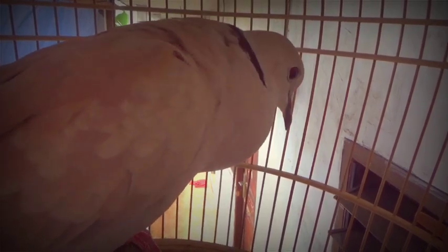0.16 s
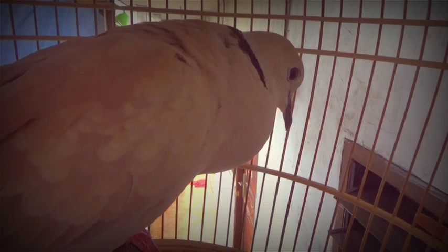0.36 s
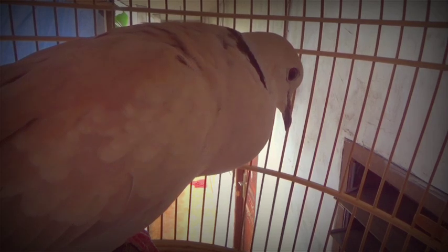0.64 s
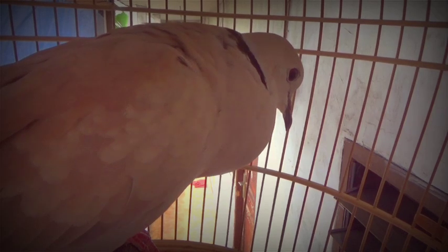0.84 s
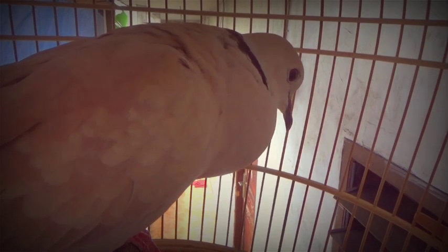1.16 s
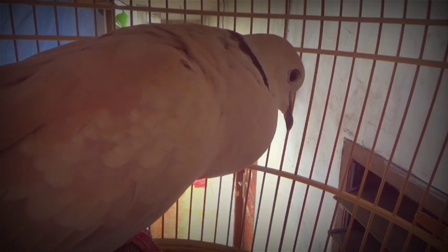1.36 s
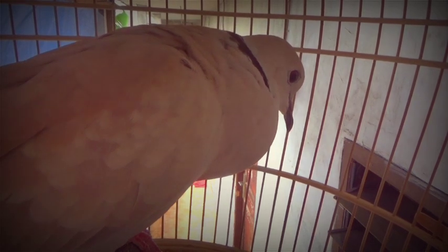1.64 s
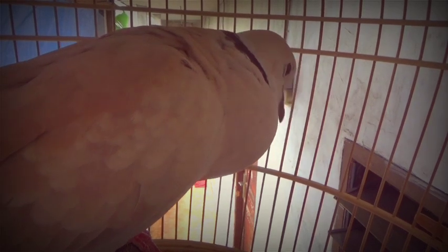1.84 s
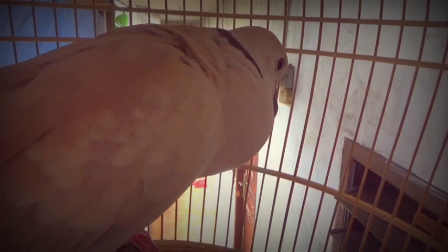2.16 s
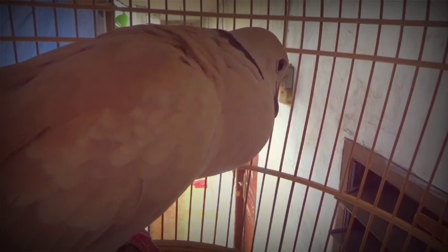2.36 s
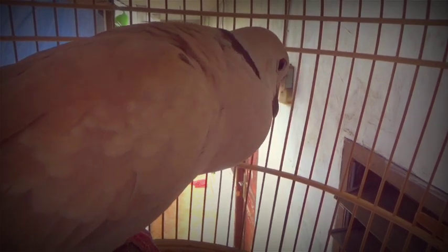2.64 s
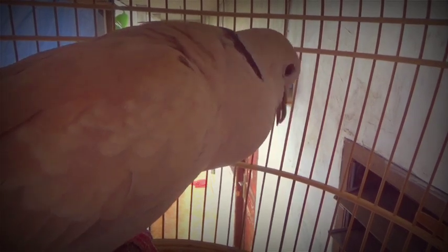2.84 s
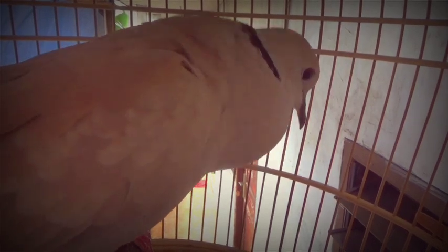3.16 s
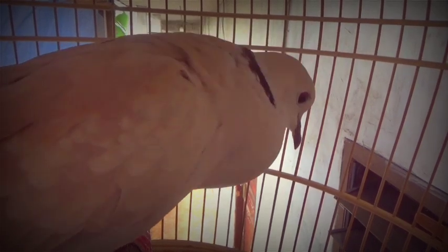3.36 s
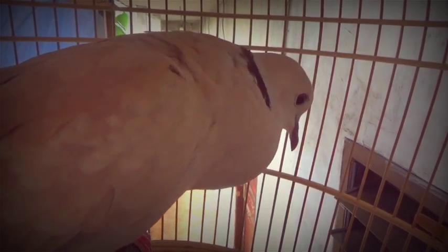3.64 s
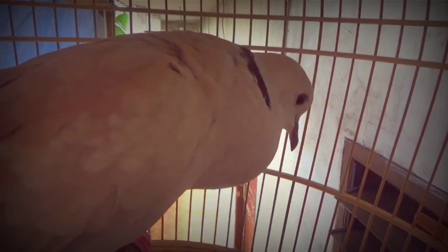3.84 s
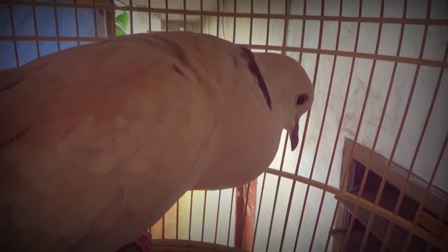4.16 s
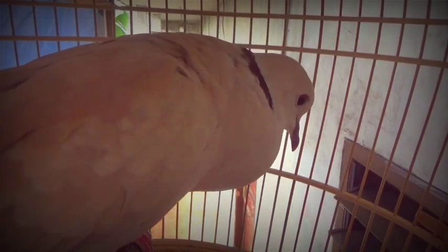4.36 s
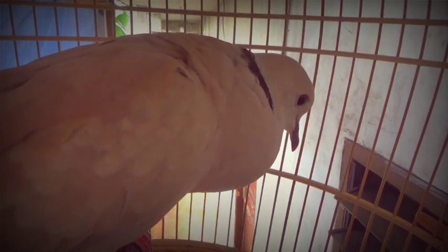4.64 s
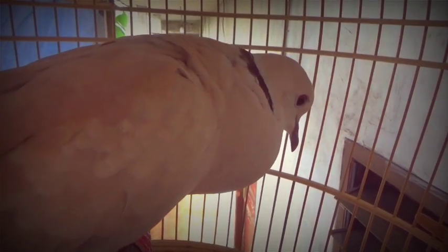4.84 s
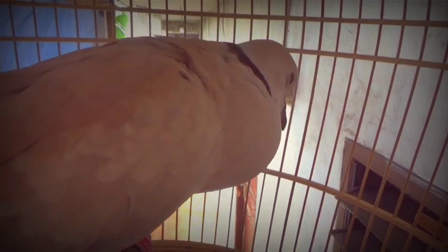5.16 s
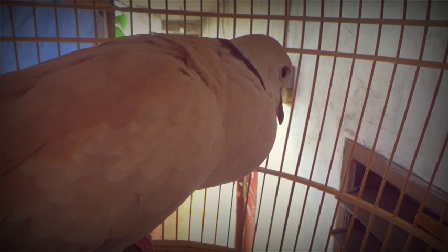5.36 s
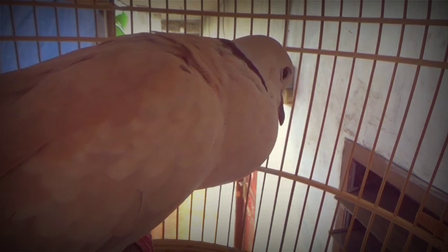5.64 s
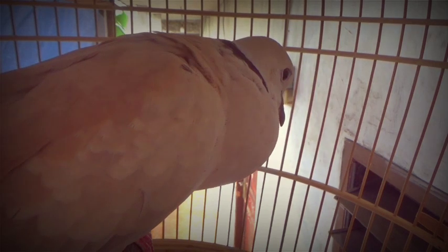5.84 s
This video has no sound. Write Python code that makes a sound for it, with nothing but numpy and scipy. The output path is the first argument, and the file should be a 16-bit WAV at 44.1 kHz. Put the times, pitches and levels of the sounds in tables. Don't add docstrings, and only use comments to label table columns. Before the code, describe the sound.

Close stereo pickup of a closed-beak dove call: low bubbling pulses, a long pure hoot sinking to a lower note, a croaky inhaled moan, a brief hoot, more pulses and another long hoot bending downward. Further off, harsh parrot-like squeaks come during the first coo and small chirps later, blurred by a short room echo. Dry cage creaks, a very faint fast insect tick, soft air hiss and low distant traffic lie underneath.

```python
import sys
import numpy as np
from scipy import signal
from scipy.io import wavfile
from scipy.ndimage import uniform_filter1d, minimum_filter1d

SR = 44100
rng = np.random.default_rng(int(sys.argv[2]) if len(sys.argv) > 2 else 0)


def convert_level_to_amplitude(level_db):
    exponent = np.asarray(level_db, float) / 20
    return 10 ** exponent


def digitize_waveform(pressure):
    field = np.atleast_2d(pressure).T
    bounded = np.clip(field, -1, 1)
    quanta = np.round(bounded * 32767).astype(np.int16)
    wavfile.write(sys.argv[1], SR, quanta)


N = 264908
T = np.arange(N) / SR

# start_s, pitch_hz, level_db
FALLING = [
    (0.284, 552.4, -14.5),
    (0.7, 543.6, -10),
    (0.87, 547.5, -9),
    (1.15, 539.4, -6.5),
    (1.45, 532, -5),
    (1.94, 506, -2.5),
    (2.03, 490, -2),
    (2.112, 460.4, -0.5),
    (2.124, 436, -2),
]
# start_s, pitch_hz, level_db
LOW = [
    (2.137, 406.5, -6.5),
    (2.17, 405.6, -8.5),
    (2.3, 408.3, -8.5),
    (2.39, 397.6, -9),
    (2.44, 399.6, -12),
]
# start_s, pitch_hz, level_db
SHORT = [
    (3.25, 540.4, -15.5),
    (3.388, 532.1, -11),
    (3.41, 539.4, -13.5),
]
# start_s, pitch_hz, level_db
LAST = [
    (4.104, 539.5, -14),
    (4.4, 536.8, -9),
    (5.001, 539.6, -7.5),
    (5.311, 538.9, -7),
    (5.55, 520.2, -3.5),
    (6.01, 473, -1.5),
]
# start_s, end_s
LONG_NOTES = [
    (0.284, 2.44),
    (3.25, 3.41),
    (4.104, 6.0),
]
# pitch_hz, left_lead_rad, left_over_right_db
STANDING_WAVES = [(405, .18, -1), (480, .03, -1.5), (505, -.1, 0), (530, -.35, -1), (540, -.42, -2),
                  (550, -.46, -3.8), (563, -.3, -6.5)]
# overtone_hz, level_db below the fundamental
LEAK = [(800, -24), (1080, -30.5), (1230, -38), (1620, -32), (2160, -44.5), (2700, -55), (3240, -46.5),
        (4300, -60.5), (5200, -43.5), (5900, -57), (6500, -61.5), (9700, -64), (11000, -68), (15000, -74.5)]
# pitch_hz, leak_db
MUFFLE = [(400, -11), (455, -19), (500, -10.5), (525, -1.2), (545, 2.5)]
SWELL_DB_PER_HZ = .05


def coo():
    parts = trill_parts()
    points = FALLING + LOW + SHORT + LAST
    for s, length, db, start_hz, end_hz in parts:
        end_db = db + SWELL_DB_PER_HZ * (end_hz - start_hz)
        points = points + [(s, start_hz, db), (s + length, end_hz, end_db)]
    pitch, level_db = in_time(sorted(map(tuple, points)))

    overshoot_hz, settle_s, scoop_share, scoop_s = 28.24, .07, .75, .013
    onset_db, onset_s = 1.5, .0066
    for start, end in LONG_NOTES:
        age = np.clip(T - start, 0, None)
        on = (T >= start) & (T < end)
        pitch = pitch + on * overshoot_hz * (np.exp(-age / settle_s) - scoop_share * np.exp(-age / scoop_s))
        level_db = level_db + on * onset_db * np.exp(-age / onset_s)

    pulses = np.zeros(N)
    for s, length, *_ in parts:
        near = slice(round((s - .01) * SR), round((s + length + .02) * SR))
        pulses[near] = np.minimum(pulses[near] + gate(T[near], s, s + length, .0072, .008), 1)
    held = sum(gate(T, start - .004, end + .006, .008, .022) for start, end in LONG_NOTES)
    level = np.minimum(pulses + held, 1) * convert_level_to_amplitude(uniform_filter1d(level_db, size=220))

    settled = uniform_filter1d(pitch, size=800)
    place_hz, lead, pan_db = np.transpose(STANDING_WAVES)
    leak_db = at_hz(MUFFLE, settled)
    pitch = pitch * (1 + .0012 * drift(36))
    shimmer = 1 + .018 * drift(43)
    tone = stack(pitch, [level * shimmer], lead=np.interp(settled, place_hz, lead))

    crop_hz, crop_width_hz, crop_db, air_db = 425, 26, -5, -15.5
    into_crop = convert_level_to_amplitude(crop_db) * pulses * tone + convert_level_to_amplitude(air_db) * level * drift(620)
    ring = resonance(into_crop, crop_hz, crop_width_hz)

    effort_db = .051 * (level_db + 7)
    overtones = [0]
    for k in range(2, 25):
        db = leak_db + at_hz(LEAK, k * pitch) + k * (effort_db + .23 * drift(4))
        overtones.append(level * convert_level_to_amplitude(db) * (1 + .023 * k * drift(70)))
    leak = stack(pitch, overtones, lead=-.9) * convert_level_to_amplitude([[2.0], [-2.0]])
    pan = convert_level_to_amplitude(np.interp(settled, place_hz, pan_db) * [[.5], [-.5]])
    return (tone + ring) * pan + leak


# start_s, length_s, pitch_hz, head_db, body_db
TRILL = [(0.030, .021, 480, -19, -21), (0.080, .021, 417, -5.5, -10.5), (0.132, .043, 421, -4.5, -10.5),
         (0.204, .0135, 493, -5, -7), (0.220, .035, 415, -8.5, -13), (3.221, .0085, 385, -6.5, -9),
         (3.832, .007, 440, -18, -19), (3.869, .011, 420, -6, -7), (3.915, .015, 438, -6, -7.5),
         (3.964, .038, 490, -10, -7), (4.033, .047, 494, -7, -6.5)]
# start_s, length_s, level_db, start_hz, end_hz
SLIDES = [
    (0.256, .021, -9.5, 425, 490),
    (3.230, .016, -7, 420, 465),
    (3.413, .012, -21, 495, 450),
    (4.081, .021, -10.5, 507, 535),
]


def trill_parts():
    head_s, gap_s, snap_hz, snap_share = .011, .0005, 495, .45
    heads, bodies = [], []
    for s, length, hz, head_db, body_db in TRILL:
        heads.append((s, min(length, head_s), head_db, hz + snap_share * (snap_hz - hz), hz))
        if length > head_s:
            bodies.append((s + head_s + gap_s, length - head_s - gap_s, body_db, hz, hz))
    return heads + bodies + SLIDES


def pops():
    pop_db, pop_hz, pop_width_hz, pop_s = -31, 790, 1500, .006
    starts = [(row[0], row[3]) for row in TRILL] + [(row[0], row[2]) for row in SLIDES]
    burst = np.zeros(N)
    for s, db in starts:
        burst[round(s * SR)] = convert_level_to_amplitude(db + pop_db)
    burst = signal.lfilter([1], [1, -np.exp(-1 / (pop_s * SR))], burst)
    puff = resonance(rng.standard_normal(N), pop_hz, pop_width_hz)
    return rms_one(resonance(puff, pop_hz, pop_width_hz)) * burst


# start_s, pitch_hz, crop_db, throat_db, roughness (0-1)
WAIL = [
    (2.51, 208.8, -19, -36, .1),
    (2.572, 230, -10.5, -30, .17),
    (2.63, 247, -13.5, -21, .13),
    (2.83, 214, -25, -16, .4),
    (2.9, 218.5, -24, -4, .25),
    (2.966, 200.6, -21, -3, .11),
    (3.02, 174.4, -26, -10, .13),
    (3.076, 164.5, -28, -18, .15),
    (3.11, 152, -44, -32, .4),
]
# start_hz, end_hz, level_db
WHISTLES = [(5130, 5170, -55), (5200, 5500, -57), (6300, 6800, -63), (8000, 9100, -54), (9600, 10200, -60),
            (14000, 13200, -62)]


def wail():
    pitch, crop_db, throat_db, rough = in_time(WAIL)
    rough = np.clip(rough, 0, 1)
    gains = [convert_level_to_amplitude(np.interp(T, [2.97, 3.02], [-38, -55]))]
    for k in range(2, 8):
        crop = convert_level_to_amplitude(crop_db) * peak(k * pitch, 440, 212, 0) ** 2
        nasal = rough ** 3 * peak(k * pitch, 672, 59, 4)
        throat = convert_level_to_amplitude(throat_db) * peak(k * pitch, 820.4, 69.5, 0)
        gains.append(crop + nasal + throat)
    levels = [g * (1 + .9 * rough * drift(70)) for g in gains]
    voice = stack(pitch * (1 + .041 * rough * drift(45)), levels, lead=.27)

    white = rng.standard_normal(N)
    dull = resonance(resonance(white, 730, 300), 730, 300)
    bright = resonance(resonance(white, 2150, 900), 2150, 900)
    rasp = convert_level_to_amplitude(-8) * dull + convert_level_to_amplitude(-27) * bright
    voice = gate(T, 2.513, 3.1, .008, .02) * voice + gate(T, 2.52, 3.155, .02, .03) * rough * rasp

    share = np.clip((T - 2.6) / .45, 0, 1)
    air = 0
    for start_hz, end_hz, db in WHISTLES:
        phase = 2 * np.pi * np.cumsum(start_hz + (end_hz - start_hz) * share) / SR
        air = air + convert_level_to_amplitude(db + drift(8)) * (.77 + drift(200)) * np.sin(phase)
    return voice + gate(T, 2.62, 3.024, .08, .15) * air


# start_s, length_s, start_hz, end_hz, level_db
SQUEAKS = [(1.145, 0.017, 3011, 2740, -24), (1.15, 0.022, 2494, 2584, -20), (1.509, 0.015, 3270, 2990, -32),
           (1.511, 0.018, 2774, 2460, -28), (1.534, .070, 2457, 2642, -22.5),
           (1.604, .05, 2653, 2745, -25.5), (1.605, 0.021, 2894, 3232, -24.5)]
# harmonic, level_db
SQUEAK_PARTIALS = [(1, -6.5), (2.001, 3), (3.999, -12.5), (5, -18.5), (5.7, -18.5)]
# start_s, length_s, start_hz, end_hz, level_db
RASPS = [
    (1.646, 0.014, 3270, 3555, -25.5),
    (1.649, 0.022, 3696, 4360, -26.5),
]
# start_s, length_s, start_hz, end_hz, level_db
CHIRPS = [(0.024, 0.041, 4960, 4780, -44), (0.084, 0.075, 5050, 5000, -60.5),
          (0.092, 0.019, 6330, 6240, -49.5), (3.696, 0.029, 4070, 3590, -36),
          (3.83, 0.026, 3480, 3450, -37.5), (5.621, 0.078, 3686, 3844, -39),
          (5.976, 0.02, 3130, 3480, -52.5)]
# start_s, length_s, start_hz, end_hz, level_db
HOOKS = [
    (3.547, 0.0434, 3447, 3930, -35),
    (3.62, 0.037, 3990, 4320, -33),
    (5.563, .030, 3193, 4006, -36),
]


def neighbours():
    calls = np.zeros(N)
    for s, length, start_hz, end_hz, db in SQUEAKS:
        third_db = -1.5 if end_hz > start_hz else -16.5
        harmonics = [(k, db + part_db) for k, part_db in SQUEAK_PARTIALS] + [(3.01, db + third_db)]
        add_call(calls, s, length, start_hz, end_hz, harmonics, rough=.019, breath_db=-12.5)
    flicks = [(s + length + .0046, .023, end_hz, end_hz * .81, db - 11)
              for s, length, start_hz, end_hz, db in HOOKS]
    for s, length, start_hz, end_hz, db in CHIRPS + HOOKS + flicks:
        harmonics = [(1, db), (2, db - 16), (3, db - 18)]
        add_call(calls, s, length, start_hz, end_hz, harmonics, rough=.014, breath_db=-8.5)
    for s, length, start_hz, end_hz, db in RASPS:
        add_call(calls, s, length, start_hz, end_hz, [(1, db), (2, db - 5.5)], rough=.06, breath_db=-3)
    direct = convert_level_to_amplitude(-5) * calls * convert_level_to_amplitude([[.6], [-.6]])
    return direct + convert_level_to_amplitude(3.5) * room(calls, t60=.31, alike=.75)


def add_call(out, s, length, start_hz, end_hz, harmonics, rough, breath_db):
    t = np.arange(round((length + .016) * SR)) / SR
    pitch = end_hz + (start_hz - end_hz) * np.exp(-2.5 * t / length)
    phase = 2 * np.pi * np.cumsum(pitch * (1 + rough * drift(140, len(t)))) / SR
    voice = sum(convert_level_to_amplitude(db) * np.sin(k * phase) * (k * end_hz < .4 * SR) for k, db in harmonics) * np.sqrt(2)
    second_db = harmonics[1][1]
    breath = convert_level_to_amplitude(breath_db + second_db) * resonance(rng.standard_normal(len(t)), 5100, 9000)
    call = voice * convert_level_to_amplitude(60 * rough * drift(60, len(t))) + breath
    call = call * gate(t, .0057, length + .0014, .00087, .015)
    at = round((s - .005) * SR)
    out[at:at + len(t)] += call[:N - at]


# start_s, peak_db
CREAKS = [(1.996, -38.5), (2.297, -46.5), (2.404, -39.5), (2.5234, -45.5), (2.6394, -47), (3.3, -31),
          (3.3529, -32), (3.9174, -48), (3.973, -49), (4.2335, -37.5), (4.401, -38), (4.5202, -45.5),
          (4.8484, -41), (4.874, -40.5), (5.15, -39.5), (5.2601, -34), (5.3398, -40.5)]
# centre_hz, width_hz, level_db
SLATS = [(2500, 700, -6), (6540, 2100, 2), (7240, 4100, 1.5), (9500, 3600, -5.5)]


def cage():
    burst = np.zeros(N)
    burst[[round(s * SR) for s, db in CREAKS]] = convert_level_to_amplitude(np.array(CREAKS)[:, 1])
    burst = signal.lfilter([1], [1, -.985], burst) * rng.standard_normal(N)
    ticks = sum(convert_level_to_amplitude(db) * resonance(burst, hz, width_hz) for hz, width_hz, db in SLATS)
    return ticks + convert_level_to_amplitude(-11) * room(ticks, t60=.25, alike=.5)


def insect():
    pip_db, pause_db, pause_s, pause_width_s = -52.5, -19, 4.5, .62
    level_db = pip_db + pause_db * np.exp(-((T - pause_s) / pause_width_s) ** 2)
    age = (T - .0135) % .04
    pips = gate(age, .00091, .0087, .0034, .0042)
    return convert_level_to_amplitude(level_db + 2 * drift(12)) * pips * np.sin(2 * np.pi * 3570 * T)


# start_s,
# rumble_db
GROUND = [(0.0, -30), (0.28, -37.5), (0.82, -31), (2.04, -31), (2.22, -44), (2.6, -33), (3.4, -35.5),
          (4.15, -36), (4.65, -31.5), (5.6, -29.5), (6.01, -35.5)]
# centre_hz, level_db per hertz
RUMBLE = [(12, -46), (20, -29), (92, 1), (122, 1.5), (204, -18.5), (330, 0), (430, -21.5), (730, -120)]
# centre_hz, level_db per hertz
HISS = [(200, -3), (350, 21), (600, 24), (900, 13), (1500, 10), (2500, 5), (4000, 1), (7000, -2),
        (11000, -7.5), (15500, -12.5)]


def street_and_air():
    rumble_db, = in_time(GROUND)
    hiss_db = -40.5 + .8 * (rumble_db - rumble_db.mean())
    rumble = convert_level_to_amplitude(rumble_db) * banded_noise(RUMBLE + [(900, -120)], patchy_db=1.5) * convert_level_to_amplitude([[2.2], [-2.2]])
    hiss = convert_level_to_amplitude(hiss_db) * banded_noise([(100, -31)] + HISS, patchy_db=1) * convert_level_to_amplitude([[.7], [-.7]])
    return rumble + hiss


# centre_hz, likeness (0-1)
LIKENESS = [(25, 0.83), (70, 1), (125, 0.67), (250, 0.34), (1000, 0.18), (4000, 0.96), (12000, 0.96)]


def banded_noise(spectrum, patchy_db):
    out = 0
    edges = 20 * 2 ** np.arange(0, 10, .5)
    white = rng.standard_normal((2, 2, N))
    for k, (low, high) in enumerate(zip(edges, edges[1:])):
        hz = np.sqrt(low * high)
        band = signal.butter(2, [low, high], "band", fs=SR, output="sos")
        mid, side = signal.sosfilt(band, white[k % 2])
        alike = np.clip(at_hz(LIKENESS, hz), 0, 1)
        gain = convert_level_to_amplitude(at_hz(spectrum, hz) + patchy_db * drift(14))
        out = out + gain * (np.sqrt(1 + alike) * mid + np.sqrt(1 - alike) * side * [[1], [-1]])
    top = signal.sosfilt(signal.butter(2, edges[-1], "high", fs=SR, output="sos"), white[1, 0])
    return rms_one(out + convert_level_to_amplitude(at_hz(spectrum, 15500)) * top)


def room(x, t60, alike):
    t = T[:SR // 2]
    white = rng.standard_normal((2, len(t)))
    low = signal.lfilter(*signal.butter(2, 7000, fs=SR), white)
    decaying = (low + (white - low) * convert_level_to_amplitude(-50 * t / t60)) * convert_level_to_amplitude(-60 * t / t60)
    mid, side = decaying * (t > .004)
    tail = np.sqrt(1 + alike) * mid + np.sqrt(1 - alike) * side * [[1], [-1]]
    return signal.fftconvolve(x[None], tail / np.sqrt(2 * np.sum(mid ** 2)), axes=1)[:, :N]


def stack(pitch, levels, lead):
    phase = 2 * np.pi * np.cumsum(pitch) / SR
    sides = np.array([[.5], [-.5]]) * lead
    return np.sqrt(2) * sum(g * np.sin((k + 1) * phase + k * k + sides) for k, g in enumerate(levels))


def resonance(x, hz, width_hz):
    r = np.exp(-np.pi * width_hz / SR)
    feedback = [1, -2 * r * np.cos(2 * np.pi * hz / SR), r * r]
    return signal.lfilter(np.array([1, 0, -1]) * (1 - r * r) / 2, feedback, x)


def peak(hz, centre_hz, width_hz, db):
    return convert_level_to_amplitude(db) / (1 + (2 * (hz - centre_hz) / width_hz) ** 2)


def drift(hz, size=N):
    r = np.exp(-2 * np.pi * hz / SR)
    return rms_one(signal.lfilter([1], [1, -2 * r, r * r], rng.standard_normal(size + 4000))[4000:])


def gate(t, start, end, rise, fall):
    ramp = np.minimum((t - start) / rise + .5, (end - t) / fall + .5)
    return np.sin(np.pi / 2 * np.clip(ramp, 0, 1)) ** 2


def rms_one(x):
    return x / np.sqrt(np.mean(x ** 2) + 1e-20)


def in_time(rows):
    s, *columns = np.transpose(rows)
    return [np.interp(T, s, c) for c in columns]


def at_hz(points, hz):
    point_hz, db = np.array(points).T
    return np.interp(np.log(hz), np.log(point_hz), db)


def scene():
    dove = coo() + wail() + pops()
    echo = convert_level_to_amplitude(-21) * room(dove.mean(0), t60=.3, alike=.7)
    return dove + echo + neighbours() + cage() + insect() + street_and_air()


def band_limit(x):
    return signal.sosfilt(signal.butter(12, 15840, fs=SR, output="sos"), x)


def record(dry):
    treble = signal.sosfilt(signal.butter(4, 2300, "high", fs=SR, output="sos"), dry.mean(0))
    treble_db = 10 * np.log10(uniform_filter1d(treble ** 2, size=1200) + 1e-9)
    release_db = 35.5 * T
    held = convert_level_to_amplitude(np.maximum.accumulate(treble_db + release_db) - release_db)
    ducked = dry * convert_level_to_amplitude(-17.5 * held)
    headroom = np.minimum(1, .96 / (np.abs(ducked).max(0) + 1e-9))
    gain = uniform_filter1d(minimum_filter1d(headroom, size=600), size=500)
    mix = signal.sosfilt(signal.ellip(10, 1, 60, 15600, fs=SR, output="sos"), ducked * gain)
    return band_limit(mix)


dry = scene()
out = record(dry)
digitize_waveform(out)
```